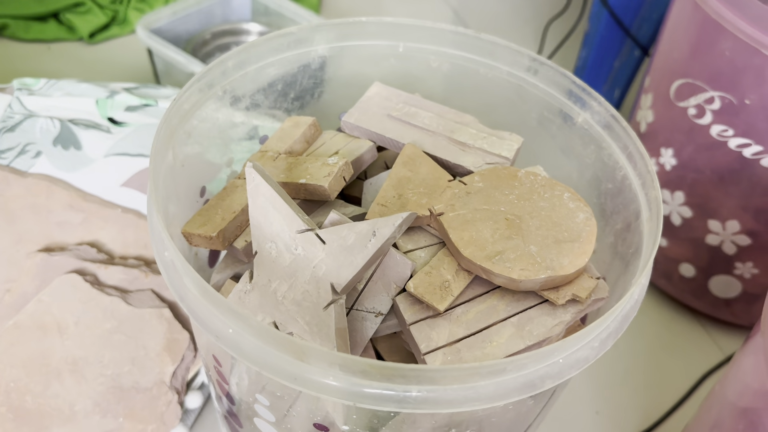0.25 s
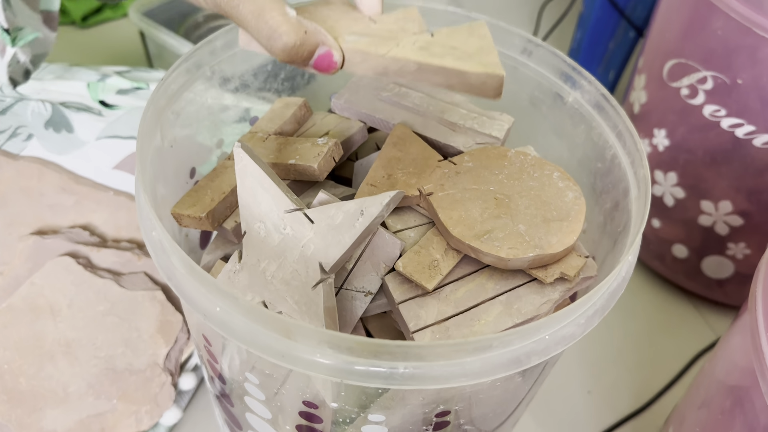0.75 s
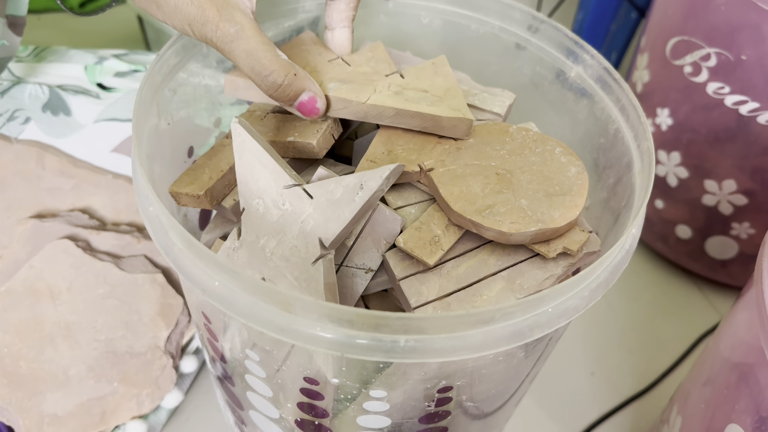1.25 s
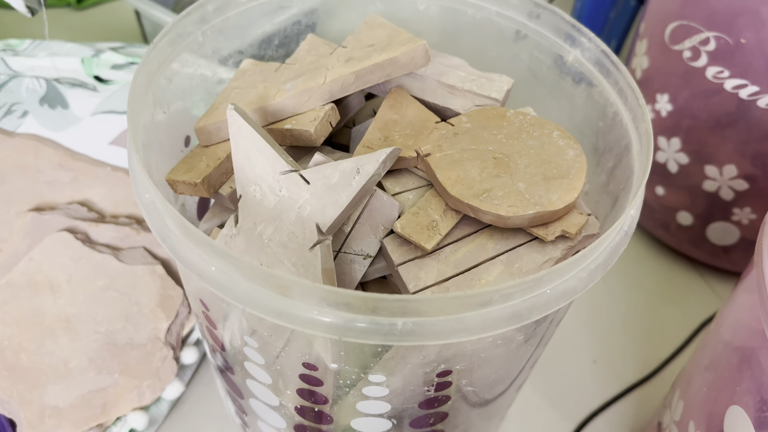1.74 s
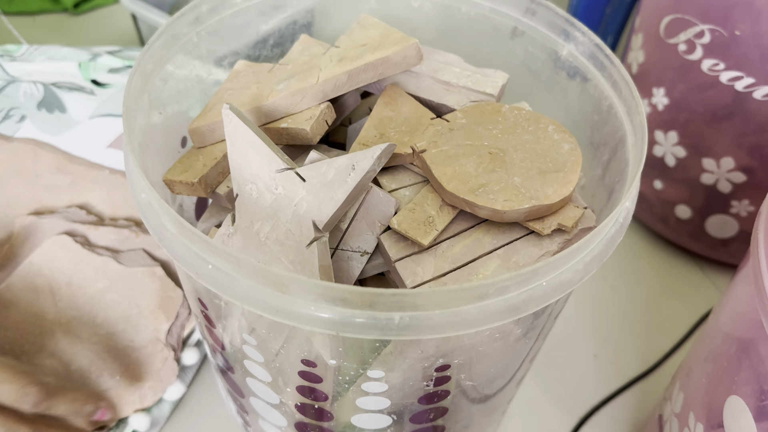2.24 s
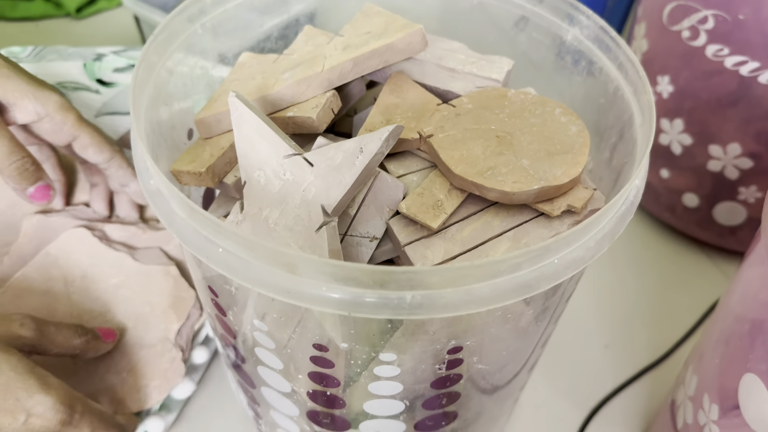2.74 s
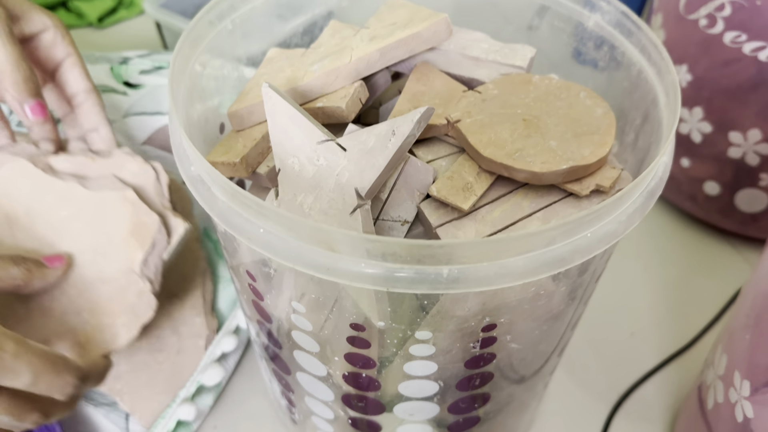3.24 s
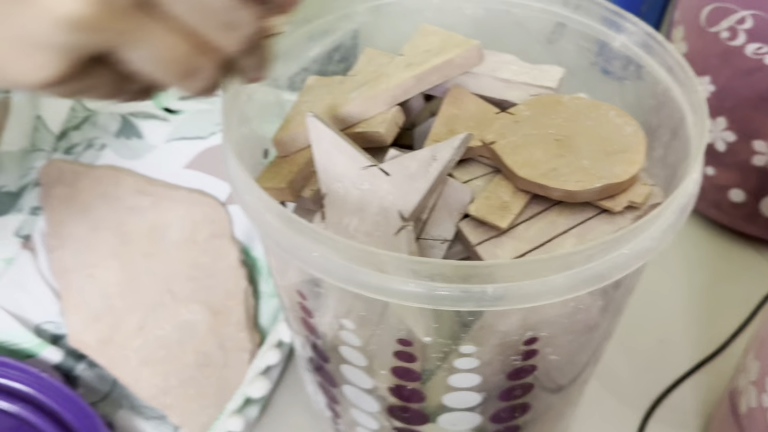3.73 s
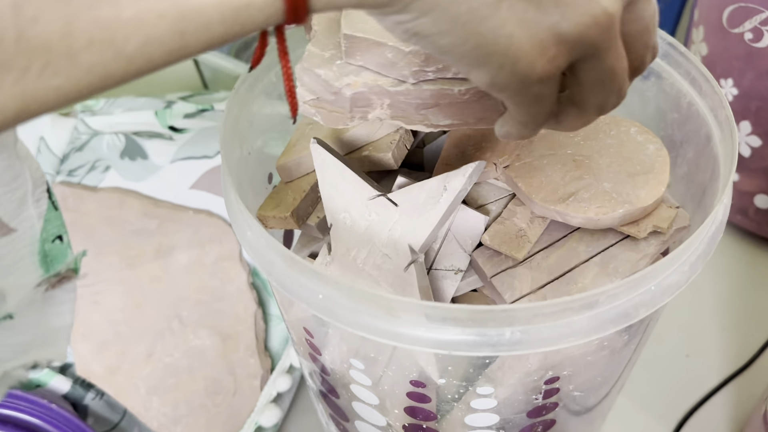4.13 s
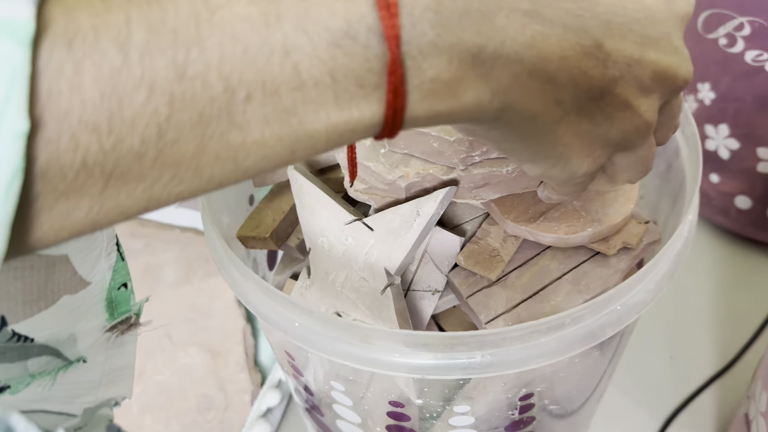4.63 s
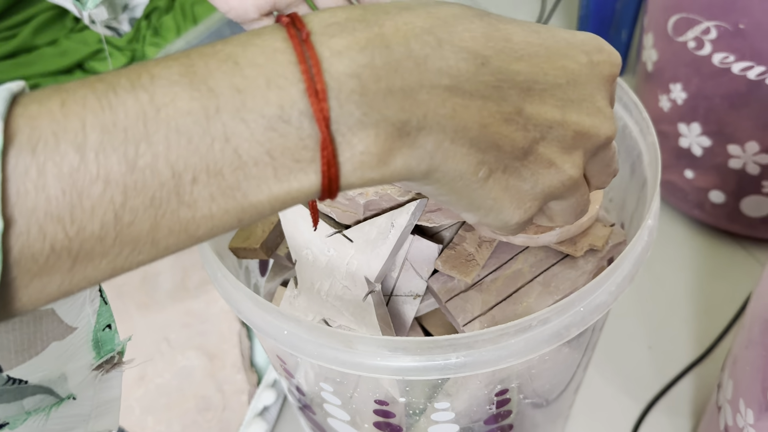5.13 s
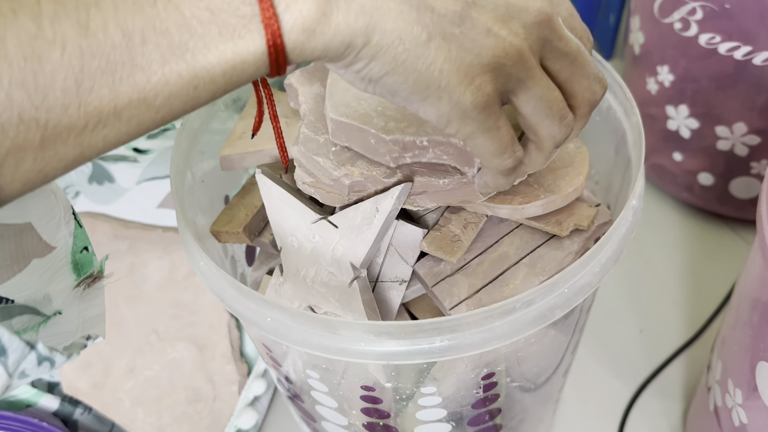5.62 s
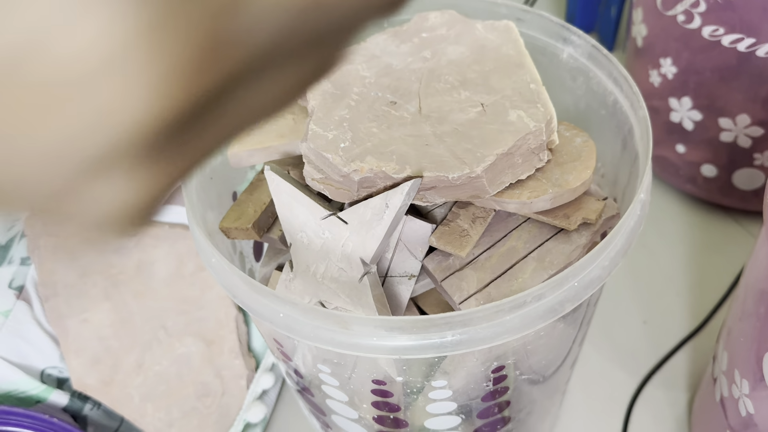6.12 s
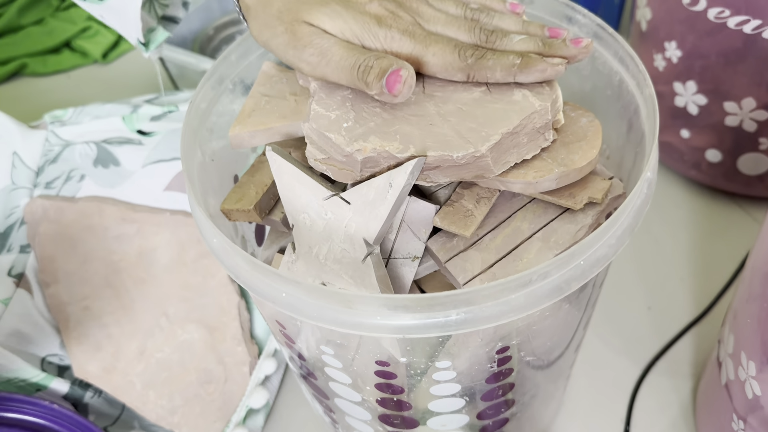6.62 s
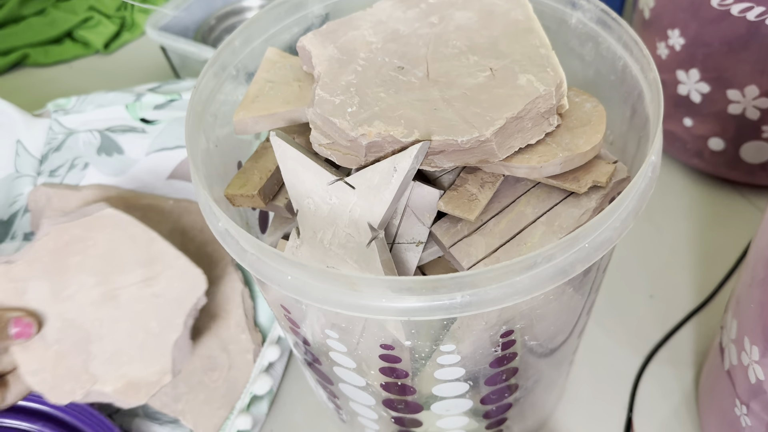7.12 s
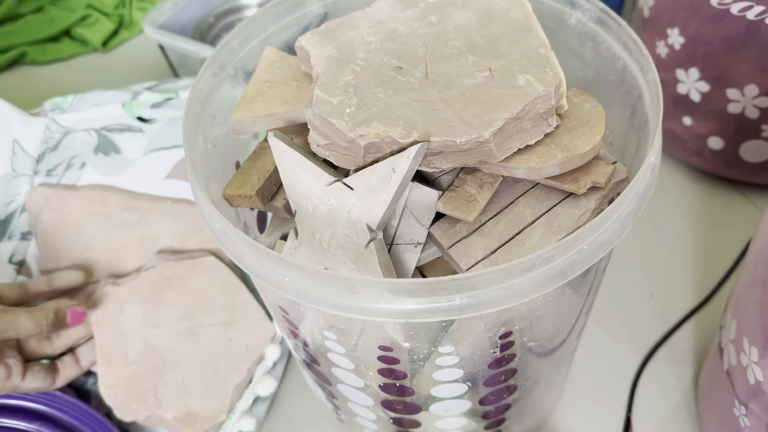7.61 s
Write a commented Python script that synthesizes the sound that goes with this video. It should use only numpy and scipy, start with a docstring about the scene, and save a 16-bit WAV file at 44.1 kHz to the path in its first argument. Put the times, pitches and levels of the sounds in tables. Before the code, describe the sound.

Hands place dry clay slabs into a plastic tub indoors: bright clacks at start and end, light knocks and gritty rubbing between.

```python
"""Dry clay pieces knock as hands lay them into a plastic tub and shift slabs on the floor beside it, in a small hard
room. Each knock is a rough contact that briefly rings a bank of modes; filtered noise adds the room's tail.
Grainy shaped noise makes skin and clay rub, a slab scrape over another and skin squeak.
Two low tones waver and a drone swells once over faint, mostly low background noise."""
import sys
import numpy as np
from scipy import signal
from scipy.fft import rfft, irfft
from scipy.io import wavfile
from scipy.ndimage import uniform_filter1d

SR = 44100
rng = np.random.default_rng(int(sys.argv[2]) if len(sys.argv) > 2 else 0)


def nominal_scale(level):
    """Amplitude ratio for a level in decibels (scalar or array-like)."""
    x = np.asarray(level, float) / 20
    return 10 ** x


def dump_mix(stems):
    """Bounce the given channels to the path in sys.argv[1] as a 16-bit WAV at rate SR."""
    frames = np.atleast_2d(stems).T  # one column per channel
    limited = np.clip(frames, -1, 1)  # hard clip at full scale
    pcm = np.round(limited * 32767).astype(np.int16)
    wavfile.write(sys.argv[1], SR, pcm)


N = 346626


def rms_one(x):
    """Scale to rms 1."""
    return x / np.sqrt(np.mean(x ** 2) + 1e-20)


def in_time(rows):
    """Columns of a curve table, interpolated at every sample."""
    s, *columns = np.transpose(rows)
    return [np.interp(np.arange(N) / SR, s, c) for c in columns]


def at_hz(points, hz):
    """Read a table on a log-frequency axis."""
    table_hz, value = np.transpose(points)
    return np.interp(np.log(hz), np.log(table_hz), value)


def drift(rate_per_s):
    """Slow random curve with spread near 1: noise averaged over about 1 / rate."""
    steps_per_s = 40
    steps = rng.standard_normal(int(N / SR * steps_per_s) + 2)
    slow = uniform_filter1d(steps, size=max(int(steps_per_s / rate_per_s), 1))
    return np.interp(np.arange(N) / SR * steps_per_s, np.arange(len(slow)), rms_one(slow))


def band(x, low_hz, high_hz):
    """Band-pass of order 2."""
    return signal.sosfilt(signal.butter(2, [low_hz, high_hz], "band", fs=SR, output="sos"), x)


def bands(white):
    """Half-octave bands of a mid and side pair, mixed to left and right: (centre Hz, stereo band)."""
    # left-right likeness of diffuse sound: hz, correlation
    likeness = [(30, 0.72), (125, 1), (300, 0.33), (700, 0.043), (2000, 0.18), (5000, 0.15), (9000, 0.15),
                (14000, 0.95)]
    edges_hz = 25 * 2 ** np.arange(0, 9.6, .5)
    for k, (low, high) in enumerate(zip(edges_hz, edges_hz[1:])):
        mid, side = band(white[k % 2], low, high)   # neighbouring bands get unrelated noise
        hz = np.sqrt(low * high)
        alike = np.clip(at_hz(likeness, hz), -1, 1)
        yield hz, np.sqrt(1 + alike) * mid + np.sqrt(1 - alike) * side * [[1], [-1]]


def coloured(white, spectrum, patchy_db):
    """Shape a stereo excitation by a spectrum; each band flickers in level; rms 1."""
    low, high = spectrum[0][0], spectrum[-1][0]
    parts = [nominal_scale(at_hz(spectrum, hz) + patchy_db * drift(10)) * part
             for hz, part in bands(white) if low <= hz <= high]
    return rms_one(sum(parts))


def grit(per_s, spread_db, grain_s):
    """Noise with random grains on it: specks of clay catching and slipping."""
    hits = rng.random(N) < per_s / SR
    grains = hits * nominal_scale(spread_db * np.minimum(rng.exponential(1, N), 4))
    swell = signal.lfilter([1], [1, -np.exp(-1 / (grain_s * SR))], grains)
    return rng.standard_normal((2, 2, N)) * (1 + swell)


def knocks(rows, modes, lag_s, contact_s, ring_db, top_db, room_db):
    """A rough contact of a few ms cracks and rings the modes; returns direct sound and room feed.

    lag_s: left-right lag before a factor of 0.95 in the bass to 0.49 in the top; negative = left first.
    contact_s: decay before reshaping; top_db: 16 kHz over 5 kHz; room_db: feed over direct sound."""
    hz, mode_db, t60_s = np.transpose(modes)[:, :, None]
    t = np.arange(8192) / SR
    f = np.maximum(np.arange(4097) * SR / 8192, 20)
    out = np.zeros((2, 2, N + len(t)))
    chance = rng.normal(0, 1, (len(rows), len(modes)))
    rough = rng.normal(0, 1, (len(rows), len(t)))
    waves = nominal_scale(mode_db - 60 * t / t60_s) * np.sin(2 * np.pi * hz * t)
    waves = waves * np.cos(2 * np.pi * 0.0056 * hz * t)   # uneven pieces split each mode into a close pair
    shape = np.exp(-t / contact_s) * (1 - np.exp(-t / 0.00095))
    side = np.array([[.5], [-.5]])
    apart = np.clip(2 - f / 4500, 0, 1)   # the top is equally loud at both ports
    delay_s = side * lag_s * (0.49 + 0.46 * apart)
    for (s, peak_db, low_db, high_db, pan_db), luck, noise in zip(rows, chance, rough):
        touch = rfft(noise * shape)
        flat = irfft(touch / np.abs(touch))   # every pitch is excited about equally
        touch = rfft(flat * np.sqrt(shape))
        ring = nominal_scale(1.5 * luck) @ waves   # each blow favours other modes
        body = 1 + nominal_scale(ring_db) * rfft(ring)   # crack plus ringing
        tilt = nominal_scale(at_hz([(40, low_db - 15.5), (250, low_db), (1000, 0.019), (5000, high_db),
                          (16000, high_db + top_db)], f))
        pan = nominal_scale(side * pan_db * np.clip(f / 600, 0, 1) * apart)   # fades out towards the bass
        near = pan * np.exp(-2j * np.pi * f * delay_s)
        sound = np.roll(irfft(touch * body * tilt * near), 20, axis=1) * (t < .17)
        sound = sound * nominal_scale(peak_db) / np.max(np.abs(sound))
        at = round(s * SR) - 20
        out[:, :, at:at + len(t)] += sound * nominal_scale(np.array([0, room_db]))[:, None, None]
    return out[:, :, :N]


def shards():
    """Clay shards knock and ring their modes."""
    # blows: start_s, peak_db, bass_db (250 Hz), treble_db (5 kHz), left_over_right_db
    blows = [(0.065, -16.5, -19, 2, 7), (0.165, -8.5, -21, -11, 7), (0.181, -31.5, 3, -41, 7)]
    # shard modes: pitch_hz, level_db, t60_s
    modes = [(486, 8.5, 0.03), (660, -5, .015), (992, -9, 0.049), (1420, 3, 0.024), (1650, -7, 0.013),
             (1970, -8.5, 0.0041), (2340, -2, 0.02), (2630, -0.5, 0.035), (3120, -2, 0.014),
             (3530, 0, 0.014), (4260, -1.5, 0.0055), (7100, -6.5, .008)]
    return knocks(blows, modes, lag_s=-0.00015, contact_s=0.008, ring_db=-35, top_db=-28.5, room_db=-11.5)


def slabs():
    """Clay slabs knock; their lowest mode rings longest."""
    # blows: start_s, peak_db, bass_db (250 Hz), treble_db (5 kHz), left_over_right_db
    blows = [(2.511, -42.5, 3.5, 4, 24), (2.869, -50, -9, -2, 12), (3.038, -49, -1, 3, 23),
             (3.458, -45.5, -27, -26, -7), (7.328, -19.5, -11, -22, 6.5), (7.344, -22.5, -9.5, -38, -13),
             (7.633, -50, -25, -1, 23), (7.741, -10.5, -16.5, -14.5, 9), (7.772, -16, -16, -35, -6)]
    # slab modes: pitch_hz, level_db, t60_s
    modes = [(201.7, 1, 0.21), (340, 2, 0.027), (358, -2, 0.03), (424, -1, 0.046), (524, -23.5, 0.034),
             (566, 9.5, 0.014), (790, 0, 0.036), (827, -7.5, 0.014), (987, -16.5, 0.044),
             (1347, -5.5, 0.089), (1788, -3.5, 0.024), (1980, -10.5, 0.02), (2332, -2, 0.029),
             (2580, -11, 0.019), (3346, 0.5, 0.029), (4730, -12, 0.023), (6360, -27, 0.024)]
    return knocks(blows, modes, lag_s=-0.00013, contact_s=0.0049, ring_db=-30.5, top_db=-20, room_db=-7)


def tub_pile():
    """Pieces knock on the pile in the tub, exciting its short modes."""
    # blows: start_s, peak_db, bass_db (250 Hz), treble_db (5 kHz), left_over_right_db
    blows = [(1.318, -45, -2, -34, 11), (1.452, -40.5, -22, -14, 9), (1.582, -31, -17.5, -31, 3),
             (1.598, -36.5, 2, -18, 20), (1.642, -46, 4, -41, 3), (4.355, -43, -11, -30.5, 0.5),
             (4.436, -48.5, -14, -22, -9), (4.477, -47.5, -23, -28, 2), (4.518, -48, -16, -31, -0.6),
             (4.555, -37, -16, -57, -1), (4.721, -43.5, -13, -42, -0.5), (4.773, -41.5, -12, -32.5, 9),
             (4.782, -39.5, -17, -44, -5), (4.843, -46.5, 12, -27, 1), (5.6, -50.5, -2.5, -37, 1),
             (5.629, -54, -1, -29, -1.5), (6.505, -41, -23, -29, 0), (6.523, -38.5, -11, -23.5, -1.5),
             (6.534, -38, -10.5, -33, -4), (6.639, -45.5, -9, -37, -1), (6.787, -39, -6.5, -19.5, 1.5),
             (6.801, -44, -5, -30, 8), (6.813, -43.5, -3, -31, 1), (6.85, -45, -4, -25, -17)]
    # pile modes: pitch_hz, level_db, t60_s
    modes = [(268, 8, 0.017), (526, -10, 0.022), (760, -2.5, 0.014), (920, -5, 0.022), (1783, -19, 0.097),
             (2330, -18, 0.031), (3080, -14, 0.005)]
    return knocks(blows, modes, lag_s=-0.000044, contact_s=0.0059, ring_db=-31, top_db=-5.5, room_db=-9.5)


def wedge():
    """A clay wedge knocks and rings its modes."""
    # blows: start_s, peak_db, bass_db (250 Hz), treble_db (5 kHz), left_over_right_db
    blows = [(1.128, -34, 2.5, -7.5, 0.6), (1.355, -49, -17, -8, 0.76), (1.414, -46.5, -29, -12, 1.9),
             (1.426, -49.5, -20, -11, 1.4)]
    # wedge modes: pitch_hz, level_db, t60_s
    modes = [(740, -3, .03), (910, -3, .03), (1930, 1, .035), (2300, 0, .02), (3280, 4, .02),
             (4650, 0, .03), (8750, 7, .01)]
    return knocks(blows, modes, lag_s=-0.000058, contact_s=0.0042, ring_db=-30.0, top_db=-13.5, room_db=-6)


def chunk():
    """A clay chunk knocks once and rings its modes."""
    # blows: start_s, peak_db, bass_db (250 Hz), treble_db (5 kHz), left_over_right_db
    blows = [(5.365, -24.5, -2.5, -2.5, 0)]
    # chunk modes: pitch_hz, level_db, t60_s
    modes = [(258, 1, .04), (770, 3, .03), (856, 3, .03), (2000, 1, .028), (2360, 0, .018), (2650, -3, .02),
             (3040, -3, .02), (3800, -5, .015), (4350, 2, .05), (4480, -1, .03), (6720, -6, .01),
             (8040, 7, .012), (9500, 6, .01)]
    return knocks(blows, modes, lag_s=-0.000065, contact_s=0.0038, ring_db=-27.0, top_db=-16.5, room_db=-12.5)


def near_ticks():
    """Dry ticks and bumps close to the microphone ring its mount and feed the room little."""
    # blows: start_s, peak_db, bass_db (250 Hz), treble_db (5 kHz), left_over_right_db
    blows = [(1.397, -46, -14, 7, -1), (1.634, -46, -8, -0.5, 4), (3.59, -45.5, -16, 11, -3),
             (3.699, -29, -25, 26, -13.5), (3.7015, -21, 7.5, -29, -11.5), (3.713, -24, 3, -27, -9),
             (3.7165, -33.5, -4.5, 2, 4), (5.936, -44, -21, 7, 4.5), (6.14, -37, -9, 8, 6)]
    # mount modes: pitch_hz, level_db, t60_s
    modes = [(430, 5, 0.0063), (1620, -12, 0.0045), (5924, -31, 0.0028)]
    return knocks(blows, modes, lag_s=-0.000048, contact_s=0.0016, ring_db=-26.5, top_db=-0.5, room_db=-24)


def floor_thuds():
    """The lower slab settles on the floor, exciting two modes."""
    # blows: start_s, peak_db, bass_db (250 Hz), treble_db (5 kHz), left_over_right_db
    blows = [(2.531, -40.5, 6, -38, 6.8), (2.597, -45, 8, -13, 4.7)]
    # floor modes: pitch_hz, level_db, t60_s
    modes = [(194.6, 4.5, 0.25), (624, 0, 0.027)]
    return knocks(blows, modes, lag_s=-0.00024, contact_s=0.0037, ring_db=-31.5, top_db=-17, room_db=-7.0)


def room(x, first_s=0.0043, swell_s=0.0026):
    """Diffuse reflections: noise that swells after the first path and dies band by band."""
    # reverberation: hz, t60_s
    decay = [(150, 0.32), (500, 0.45), (1500, 0.39), (4000, 0.33), (10000, 0.73)]
    # tail colour: hz, density_db (per Hz)
    colour = [(150, 8.5), (400, 3), (1200, 4), (3000, 3), (6000, -3), (12000, -9)]
    t = np.arange(SR * 3 // 4) / SR
    tail = sum(part * nominal_scale(at_hz(colour, hz) - 60 * t / at_hz(decay, hz))
               for hz, part in bands(rng.standard_normal((2, 2, len(t)))) if hz > 100)
    tail = tail / (1 + np.exp(-(t - first_s) / swell_s))
    tail = tail / np.sqrt(len(t)) / np.sqrt(np.mean(tail ** 2))   # mean channel energy 1
    return signal.fftconvolve(x, tail, axes=1)[:, :N]


def rubbing():
    """Skin and dust hiss high, clay drags lower and grittier, fine rustle sits on top; strokes swell and fade."""
    # rubbing strokes: middle_s, half_length_s, hiss_db, rustle_db, drag_db
    strokes = [(0.09, 0.31, -74, -85.5, -65), (0.524, 0.088, -74.5, -88.5, -72),
               (0.77, 0.066, -83, -98, -69), (1.312, 0.075, -78, -75, -61), (1.424, 0.043, -64.5, -86, -56),
               (1.503, .05, -60, -56, -52), (1.618, 0.098, -80, -92, -51.5),
               (2.036, 0.052, -76, -71.5, -68), (2.363, 0.19, -73.5, -84, -71.5),
               (2.566, 0.085, -73.5, -91, -62.5), (2.8, 0.085, -73, -81, -64.5),
               (2.907, 0.078, -66, -80, -62.5), (3.054, 0.052, -73, -96, -62),
               (3.46, 0.43, -75.5, -83, -65), (3.703, .02, -56.5, -75.5, -42),
               (3.8, 0.061, -78, -92, -64.5), (4.352, 0.17, -97, -92, -64.5),
               (4.52, 0.094, -68, -89, -60.5), (4.813, .07, -70.5, -80, -55.5),
               (4.93, 0.11, -73.5, -79, -82), (5.361, 0.027, -69, -91, -71), (5.47, 0.067, -93, -99, -61.5),
               (5.626, 0.028, -71.5, -74, -59.5), (5.841, 0.061, -69.5, -63.5, -84),
               (5.963, .05, -78, -73, -71), (6.31, 0.21, -72.5, -86, -72),
               (6.526, 0.056, -68.5, -92, -60.5), (6.805, 0.028, -70, -99, -58.5),
               (7.05, .2, -76, -80, -75), (7.4, 0.12, -75.5, -94, -59.5), (7.64, 0.176, -70, -73.5, -61.5)]
    # hands between strokes: hiss_db, rustle_db, drag_db
    idle_db = [-85.5, -88, -72]
    # hiss of skin and dust: hz, density_db (per Hz)
    dust_spectrum = [(1180, -10.5), (2000, -7), (2210, 1), (2410, 4), (3050, -0.5), (5160, -2), (7430, 0),
                     (10500, -28.5), (11000, -57.5), (14300, -53), (22000, -120)]
    # drag of clay on clay: hz, density_db (per Hz)
    drag_spectrum = [(88, -34), (150, -9.5), (303, -1.5), (611, -3), (710, -9.5), (1220, -13.5),
                     (2190, -27), (3000, -30.5), (3900, -56.5), (6600, -120)]
    t = np.arange(N) / SR
    power = nominal_scale(np.array(idle_db))[:, None] ** 2
    for s, half_s, *db in strokes:
        power = power + nominal_scale(np.array(db))[:, None] ** 2 * np.exp(-((t - s) / half_s) ** 2 * 2)
    dust, fine, drag = np.sqrt(power)
    dust = dust * coloured(grit(60, 1.4, 0.0021), dust_spectrum, patchy_db=-3.0)
    drag = drag * coloured(grit(70, 3.8, 0.0034), drag_spectrum, patchy_db=2.5)
    mid, side = band(grit(60, 3.0, .001)[0], 10750, 22000)
    return dust + drag + fine * rms_one(mid + 1.2 * side * [[1], [-1]])


def sliding_slab():
    """Slab slides over slab: friction noise sets its resonances faintly singing."""
    # sliding level: time_s, level_db
    slide_level = [(2.2, -110), (2.35, -76), (2.55, -83), (2.68, -85), (2.9, -80), (3.1, -94), (3.4, -87),
                   (3.55, -110), (7.32, -110), (7.345, -63), (7.45, -80), (7.6, -71), (7.72, -65),
                   (7.86, -81)]
    # slab resonances: pitch_hz, width_hz, level_db
    peaks = [(1370, 56, -6.5), (1900, 77, -5.5), (3380, 97, -8.5), (4580, 140, -8.5), (4700, 120, -6.5),
             (6100, 300, -5.5), (7550, 150, -13)]
    scrape = grit(80, 3.3, 0.0018)[0]
    song = sum(nominal_scale(db) / np.sqrt(width) * band(scrape, hz - width / 2, hz + width / 2)
               for hz, width, db in peaks)
    level_db, = in_time(slide_level)
    return nominal_scale(level_db) * rms_one(song + .7 * song[::-1])   # each channel leaks into the other


def squeaks():
    """Skin slips on clay: brief narrow noise whistles inside the rubbing hiss."""
    # squeaks: middle_s, half_length_s, pitch_hz, level_db
    slips = [(1.543, 0.026, 7500, -65.5), (2.926, 0.033, 6760, -72), (4.507, 0.039, 6400, -70),
             (5.856, 0.057, 6750, -72.5)]
    t, noise = np.arange(N) / SR, rng.standard_normal(N)
    return sum(nominal_scale(db) * np.exp(-((t - s) / half_s) ** 2) * rms_one(band(noise, hz - 200, hz + 200))
               for s, half_s, hz, db in slips)


def hum():
    """Two low tones waver at random in pitch and level; a gliding drone swells and fades once."""
    # hum tones: pitch_hz, level_db, pitch_waver_hz (spread)
    tone_rows = [(62.4, -0.5, 2.6), (86.5, -2.6, 3.2)]
    # common level of the two tones: time_s, level_db
    level_rows = [(0, -59), (.9, -64.5), (1.1, -57.5), (1.8, -57.5), (2.2, -61.5), (2.6, -57), (3.5, -56.5),
                  (4.0, -59.5), (4.7, -57), (5.6, -61), (6.6, -53.5), (7.2, -60), (7.86, -53)]
    # drone: time_s, pitch_hz, level_db
    drone_rows = [(3.2, 59.5, -74), (3.48, 58.2, -52), (3.72, 58.6, -48), (3.81, 58.3, -42.5),
                  (4.07, 57.4, -40), (4.18, 58.2, -42), (4.29, 59.6, -46), (4.4, 63.3, -68),
                  (4.6, 63, -110)]
    waver_db, wavers_per_s = 6.5, 13
    level_db, = in_time(level_rows)
    lines = [in_time(drone_rows)]
    for hz, db, by_hz in tone_rows:
        pitch_hz = hz + by_hz * drift(wavers_per_s / 2)
        swing_db = waver_db * np.minimum(drift(wavers_per_s), 1)   # upward swings are capped
        lines.append((pitch_hz, level_db + db + swing_db))
    tones = sum(np.sqrt(2) * nominal_scale(db) * np.sin(2 * np.pi * np.cumsum(hz) / SR) for hz, db in lines)
    return tones * nominal_scale(np.array([[-.3], [.3]]))   # right slightly louder


def background_air():
    """Faint steady noise, strongest below 250 Hz, with slightly flickering bands."""
    # background noise: hz, density_db (per Hz)
    air_spectrum = [(15, -39), (25, -13.5), (55, -1), (82, 0.5), (141, -8), (195, -5.5), (249, -20.5),
                    (775, -32), (1290, -27.5), (3620, -42.5), (6920, -45), (9070, -47.5), (11000, -69),
                    (13600, -59.5), (16000, -55)]
    return nominal_scale(-59) * coloured(rng.standard_normal((2, 2, N)), air_spectrum, patchy_db=0.64)


def scene():
    """Sum the knocks, all reaching the left port first, their room tail, friction sounds and background."""
    direct, send = shards() + slabs() + tub_pile() + wedge() + chunk() + near_ticks() + floor_thuds()
    friction = rubbing() + sliding_slab() + squeaks()
    return direct + room(send) + friction + hum() + background_air()


def roll_off(x):
    """The treble ends steeply here."""
    return signal.sosfilt(signal.butter(12, 16500, fs=SR, output="sos"), x)


def record(dry):
    """The microphone loses the deepest bass; little sound is kept near 11 kHz."""
    x = signal.sosfilt(signal.butter(2, 40, "high", fs=SR, output="sos"), dry)
    x = signal.sosfilt(signal.butter(2, [9900, 12500], "bandstop", fs=SR, output="sos"), x)
    return roll_off(x)


dry = scene()
out = record(dry)
dump_mix(out)
```